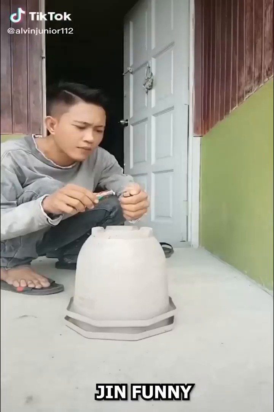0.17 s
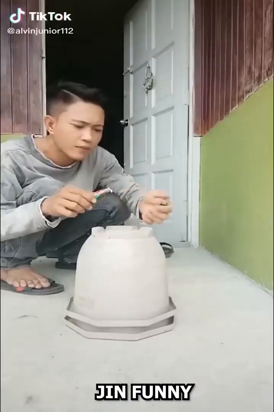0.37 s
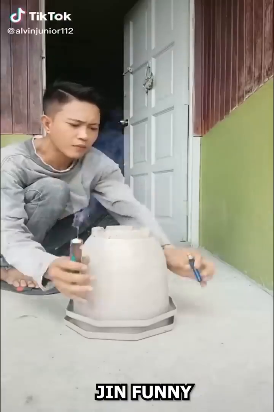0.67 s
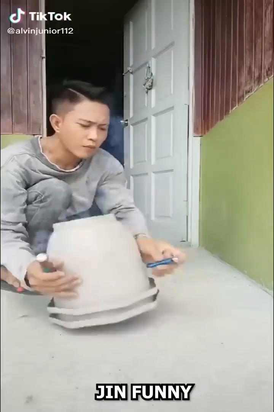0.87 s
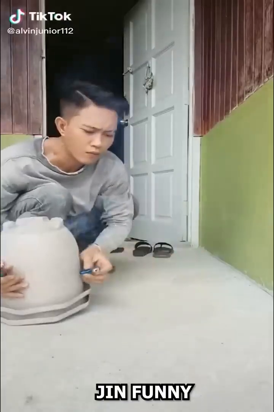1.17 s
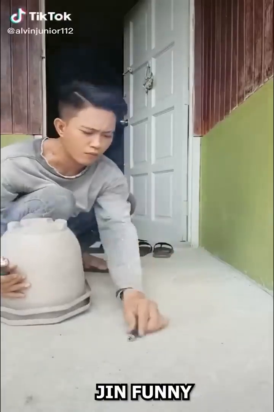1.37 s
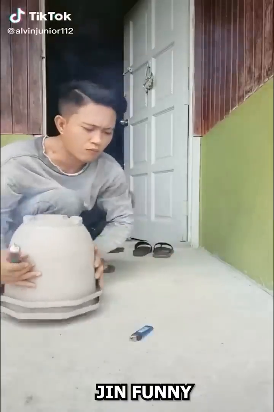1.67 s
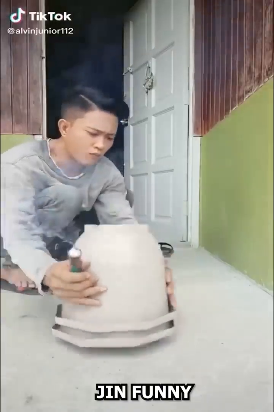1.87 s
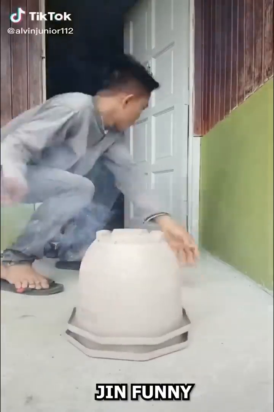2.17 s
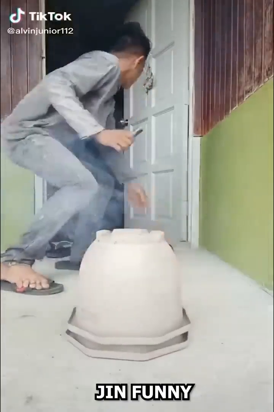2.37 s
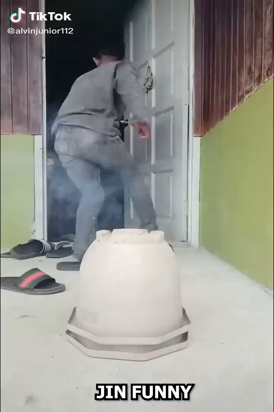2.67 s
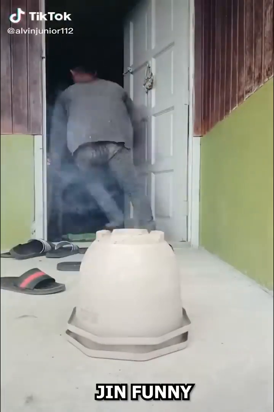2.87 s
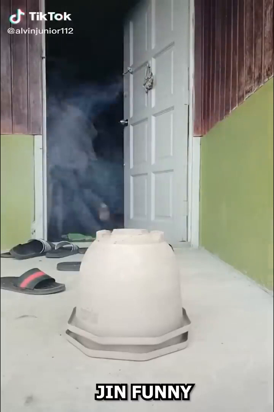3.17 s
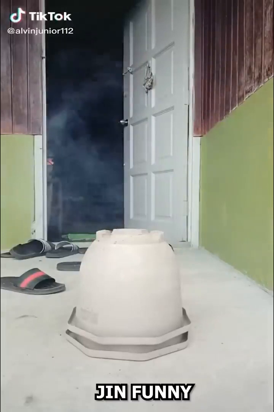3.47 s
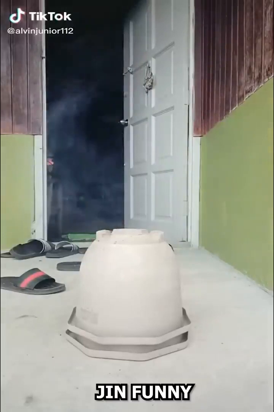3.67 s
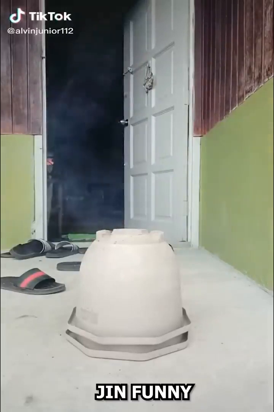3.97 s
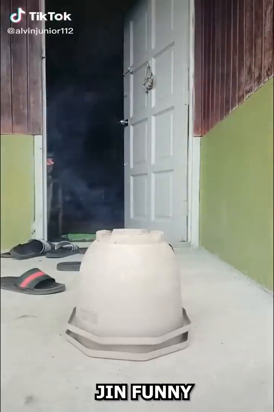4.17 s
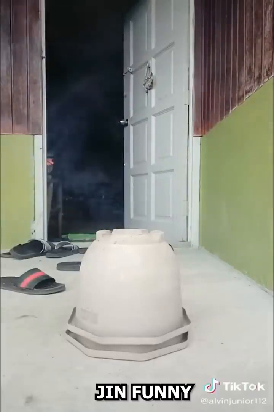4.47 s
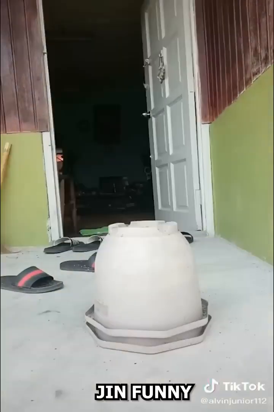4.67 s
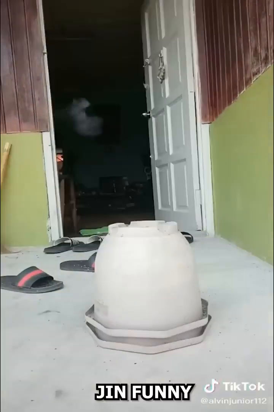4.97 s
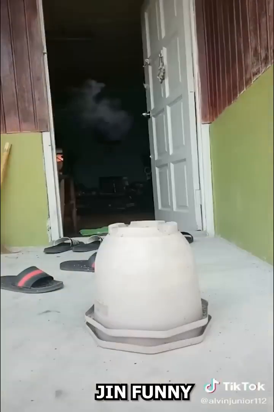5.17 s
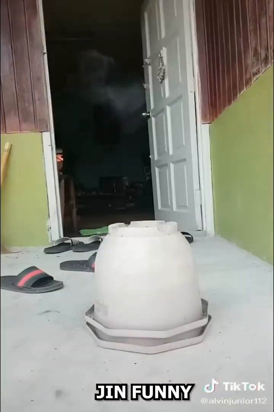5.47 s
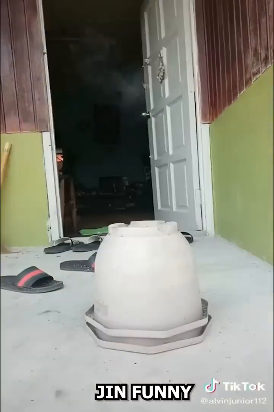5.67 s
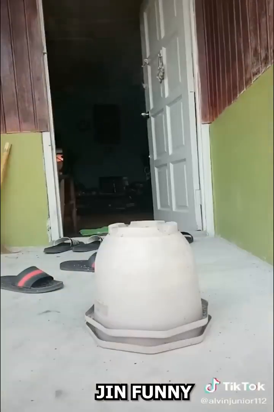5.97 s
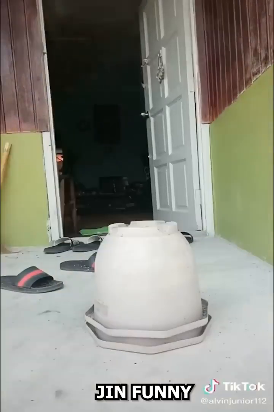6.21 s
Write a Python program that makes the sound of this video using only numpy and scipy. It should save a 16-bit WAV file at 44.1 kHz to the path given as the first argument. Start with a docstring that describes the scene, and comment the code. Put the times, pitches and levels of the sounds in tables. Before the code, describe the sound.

A lighter snaps close to the microphone over faint insects, thin animal calls and the low throb of an engine outdoors. Cloth rustles and a dog barks twice in the distance, then a wooden door takes a quick cluster of knocks and its latch clatters. After a short lull, a firecracker suddenly explodes under a plastic pot, far louder than the rest, and its dark, rolling echoes carry on to the end.

```python
"""A porch, in mono: over outdoor hiss, insects and an engine idling out of sight, animals call far off, a
lighter clicks, clothes rustle and a distant dog barks twice. Someone bumps through a wooden door, ringing its
panel and rattling its latch. Then a second scene, in stereo: an explosion goes off with a tearing crack and a
low boom, and leaves a long, loud roar of echoes that grows duller."""
import sys
import numpy as np
from scipy import signal
from scipy.io import wavfile
from scipy.ndimage import uniform_filter1d, minimum_filter1d

SR = 44100
rng = np.random.default_rng(int(sys.argv[2]) if len(sys.argv) > 2 else 0)


def put_to_file(sound):
    """Save the sound as 16-bit audio at rate SR, in the file named by the first command-line argument."""
    columns = np.atleast_2d(sound).T  # one column per channel
    safe = np.clip(columns, -1, 1)
    whole_steps = np.round(safe * 32767)
    wavfile.write(sys.argv[1], SR, whole_steps.astype(np.int16))


N = 279591
TIME = np.arange(N) / SR
BANG_S, CRACK_RISE_S = 4.688, 0.014


def amp(db):
    """Decibels to gain."""
    return 10 ** (np.asarray(db) / 20)


def unit(x):
    """Scales to rms 1."""
    return x / np.sqrt(np.mean(x ** 2) + 1e-20)


def curve(rows, t, column=1):
    """One column of a table, joined by straight lines in time."""
    rows = np.array(rows)
    return np.interp(t, rows[:, 0], rows[:, column])


def read(points, hz):
    """A table read on a log-frequency axis."""
    f, value = np.transpose(points)
    return np.interp(np.log(hz + 1), np.log(f + 1), value)


def ramp(start_s, length_s):
    """Rises from 0 to 1."""
    return np.clip((TIME - start_s) / length_s, 0, 1)


def since(s):
    """Seconds gone since s; 0 before."""
    return np.maximum(TIME - s, 0)


def swell(s, db, rise_s, fall_s):
    """A bell-shaped gain that peaks at s."""
    return amp(db) * np.exp(-((TIME - s) / np.where(TIME < s, rise_s, fall_s)) ** 2)


def add(mix, s, sound):
    """Mixes a sound in at time s."""
    part = mix[round(s * SR):][:len(sound)]
    part += sound[:len(part)]


def colour(x, spectrum):
    """Minimum-phase EQ of unit energy: the spectrum sets the tone, not the level."""
    hz = abs(np.fft.fftfreq(4096, 1 / SR))
    log_gain = np.log(amp(read(spectrum, hz)))
    taps = np.fft.ifft(np.exp(np.conj(signal.hilbert(log_gain)))).real
    return signal.oaconvolve(x, taps / np.linalg.norm(taps))[:len(x)]


def noise(spectrum):
    """Steady noise of rms 1, coloured by rows of f/Hz, level/dB."""
    return unit(colour(rng.standard_normal(N), spectrum))


def fade(x, loss_db):
    """Takes away loss_db(s, Hz) from each moment and band."""
    hz, t, bands = signal.stft(x, SR, nperseg=512)
    return signal.istft(bands * amp(-loss_db(t, hz[:, None])), SR, nperseg=512)[1][:len(x)]


def steady(x, span_s):
    """Holds the rms at 1 over spans of span_s."""
    return x / np.sqrt(abs(uniform_filter1d(x ** 2, int(span_s * SR))) + 1e-9)


def bursts(rows, spectrum):
    """Short bursts of grit, each falling 30 dB over its length, ringing with one colour."""
    envelope = np.zeros(N)
    for s, db, length in rows:
        add(envelope, s, amp(db - 30 * TIME[:SR // 4] / length))
    return colour(envelope * rng.choice([-1., 1.], N), spectrum)


def porch(x, wet_db, stretch=1):
    """Adds a tail of sparse reflections, each band dying at its own speed."""
    decay = [(200, 0.51), (900, 0.31), (4000, 0.34), (12000, 0.26)]  # reverb time before stretching: f/Hz, t60/s
    taps = rng.standard_normal(SR) * (rng.random(SR) < .1) * (TIME[:SR] > .004)
    tail = fade(taps, lambda t, hz: 60 * t / (stretch * read(decay, hz)))
    return x + amp(wet_db) * signal.oaconvolve(x, tail / np.linalg.norm(tail))[:N]


def stereo(source, width):
    """Two draws of a source as mid and side; width sets the side's level in each band."""
    side = fade(source(), lambda t, hz: -read(width, hz))
    return source() + np.array([side, -side])


def yard(air_db=-44.5, insect_db=-59, flutter_db=2.0):
    """Outdoor hiss and shrill, fluttering insects; both beds sink in a hush, the insects twice as far."""
    air_colour = [(15, -41), (25, -5), (75, -13.5), (122, -16.5), (232, -17), (419, -23.5), (912, -22),
                  (1290, -27), (2500, -23.5), (3680, -15.5), (4600, -23.5), (5970, -25.5), (7210, -37.5),
                  (13000, -36.5), (15300, -41.5)]  # outdoor hiss: f/Hz, level/dB
    insect_colour = [(2300, -27.5), (3000, -3), (3650, 9.5), (4100, 4.5), (4600, -68), (6200, -14),
                     (6800, -37)]  # the insects' band: f/Hz, level/dB
    insect_swells = [(1.2, -55, 0.29), (1.65, -52, 0.8), (3.72, -51, 0.18), (4.01, -49.5, 0.076),
                     (4.25, -47, 0.029)]  # surges above their bed: t/s, level/dB, half width/s
    hush_s, fall_s, hush_db, recover_db_per_s = 2.676, 0.32, -6.5, 2.5
    flutter = amp(flutter_db * noise([(3, -3.5), (12, 0.5), (50, -68.5)]))
    hush = amp(hush_db * ramp(hush_s, fall_s) + recover_db_per_s * since(hush_s + fall_s))
    dip = 1 - swell(3.32, -11.5, 0.13, 0.13)  # the air dips briefly after the door
    air = noise(air_colour) * amp(air_db) * hush * dip
    surges = sum(swell(s, db, width, width) for s, db, width in insect_swells)
    insects = noise(insect_colour) * (amp(insect_db) * hush ** 2 + surges) * flutter
    return air + insects


def engine(firing_hz=24.3, idle_db=-60.5, rumble_db=-13):
    """Slow exhaust pulses from afar: only the low orders arrive, each wavering, in a dull rumble."""
    orders = [(2, -22.5), (3, 0), (4, -7.5), (5, -24.5), (6, -21), (7, -38), (8, -30.5)]  # exhaust harmonics: multiple of the firing rate, level/dB
    rumble_colour = [(15, -15), (30, 1), (50, 6.5), (110, -7), (250, -5), (500, -36.5)]  # noise under the throb: f/Hz, level/dB
    swells = [(1.65, -30.5, .55, 0.25), (2.55, -39, 0.45, 0.22), (3.7, -36.5, 0.24, .22)]  # three rises out of the idle: t/s, level/dB, rise/s, fall/s
    waver = [(3, 3), (12, 1.5), (50, -83)]
    throb = sum(amp(db) * np.cos(2 * np.pi * k * firing_hz * TIME) * (1 + .16 * noise(waver))
                for k, db in orders)
    level = amp(idle_db) + sum(swell(*row) for row in swells)
    return (unit(throb) + amp(rumble_db) * noise(rumble_colour)) * level


def far_calls(octave_db=-10):
    """Thin animal calls with one overtone, most of them sagging in pitch."""
    calls = [(0, 0.19, 762, 765, -56.5), (0.675, .13, 636, 617, -59), (.8, 0.088, 598, 573, -55.5),
             (0.905, 0.093, 584, 558, -56.5)]  # faint glides: t/s, length/s, first f/Hz, last f/Hz, level/dB
    out = np.zeros(N)
    for s, length, first_hz, last_hz, db in calls:
        size = int(length * SR)
        phase = 2 * np.pi * np.cumsum(np.linspace(first_hz, last_hz, size)) / SR
        call = np.sin(phase) + amp(octave_db) * np.sin(2 * phase)
        add(out, s, amp(db) * unit(call * signal.windows.tukey(size, .5)))
    return porch(out, wet_db=-14)


def lighter():
    """The wheel scrapes, the striker snaps, and the porch answers briefly."""
    strokes = [(.349, -32, 0.055), (.359, -31, 0.04), (.3655, -19, 0.015), (.3685, -8.5, 0.0069),
               (.383, -24, .008), (.4125, -24, 0.0072)]  # scrape and snap: t/s, level/dB, length/s
    ring = [(120, -13), (380, -5.5), (650, -19), (1000, -17.5), (2400, -15.5), (3300, 3), (3900, 7.5),
            (4800, -7), (6100, -6.5), (7200, -20), (11000, -25.5), (14000, -23), (16000, -32)]  # the lighter's bright ring: f/Hz, level/dB
    return porch(bursts(strokes, ring), wet_db=-6.5, stretch=.8)


def clothes():
    """Cloth rustles in soft, dry bursts."""
    rustles = [(.8, -49, 0.33), (1.12, -43, 0.3), (1.19, -44.5, 0.2)]  # brushes of fabric: t/s, level/dB, length/s
    cloth_colour = [(1000, -31), (2400, -9), (3100, 5), (3700, -5), (5000, -7), (7000, -24)]  # their thin hiss: f/Hz, level/dB
    return bursts(rustles, cloth_colour)


def dog(rough=0.62):
    """Hoarse barks, part voice and part breath, arch in pitch and ring on between the houses."""
    barks = [(1.304, -39.5), (1.748, -38.5)]  # two barks: t/s, level/dB
    contour = [(0, 301.6, -8.5), (.025, 368, 5), (.055, 473, 4.5), (.1, 425, 4), (.14, 395, -8)]  # pitch and effort within a bark: t/s, f/Hz, level/dB
    throat = [(250, -6), (500, -9.5), (720, 0.5), (870, 0.5), (1050, -2), (1300, -8.5), (1800, -13),
              (3000, -33.5)]  # throat resonances: f/Hz, level/dB
    t, out = TIME[:int(contour[-1][0] * SR)], np.zeros(N)
    for s, db in barks:
        cycles = np.cumsum(curve(contour, t)) / SR
        folds = unit(sum(np.cos(2 * np.pi * k * cycles) for k in range(1, 8)))
        puffs = np.exp(-(cycles % 1)) * rng.standard_normal(len(t))
        bark = (1 - rough) * unit(colour(folds, throat)) + rough * unit(colour(puffs, throat))
        add(out, s, bark * amp(db + curve(contour, t, column=2)))
    return porch(out, wet_db=-5.0, stretch=2.2)


def door(low_cut_hz=158, swing_s=0.0019, rattle_s=0.069, clack_s=0.0084):
    """Each bump rings the panel, brighter near its edge; the latch rattles and clacks."""
    # knocks on the wood: t/s, level/dB, contact/ms, hand damping/(dB/s), upper modes/dB, rattle/dB
    bumps = [(2.871, -6.5, .39, 115, -0.5, -36), (2.9058, -9.5, 1.1, 450, 10, -40),
             (2.935, -3, 1.3, 450, -10, -26.5), (3, -20.5, 2.1, 9, -23, -30.5),
             (3.051, -12, 2.4, 297, -27, -25.5), (3.0591, -2.5, 1.3, 54, -9.5, -42),
             (3.122, -26, 2.8, 108, -7, -32)]
    panel_modes = [(203, 6, 0.18), (349, 4.5, 0.1), (411, -2, 0.085), (650, -14, 0.026), (980, -32, 0.024),
                   (1443, -30.5, .03)]  # wood resonances, lowest first: f/Hz, level/dB, t60/s
    clacks = [(2.8633, -18.5), (2.872, -8), (2.9905, -29.5), (3.0187, -25), (3.047, -22), (3.1078, -28),
              (3.1207, -24.5)]  # sharp latch hits: t/s, level/dB
    latch_colour = [(600, -4), (1500, -17), (2000, -6), (2900, -9), (4000, -13), (5900, -26), (7000, -38),
                    (15000, -44)]  # the latch's ring: f/Hz, level/dB
    thud = [(3.117, -20.5, 0.088)]  # the door settles: t/s, level/dB, length/s
    thud_colour = [(25, -12), (70, -0.5), (130, -10), (300, -40), (1000, -65)]  # its low weight: f/Hz, level/dB
    t, panel = TIME[:SR // 2], np.zeros(N)
    modes = [amp(db - 60 * t / t60) * np.sin(2 * np.pi * hz * t) for hz, db, t60 in panel_modes]
    lowest = modes[0] * (1 - np.exp(-t / swing_s))  # the whole panel takes a moment to swing
    for s, db, contact_ms, damping, upper_db, _ in bumps:
        push = np.sin(np.pi * np.minimum(t * 1000 / contact_ms, 1))
        ring = (lowest + amp(upper_db) * sum(modes[1:])) * amp(-damping * t)
        add(panel, s, amp(db) * signal.fftconvolve(push / push.sum(), ring))
    # little of the panel's deep bass comes through
    panel = signal.sosfilt(signal.butter(4, low_cut_hz, "high", fs=SR, output="sos"), panel)
    wood = porch(panel, wet_db=-16.0)
    latch_hits = [(s, db, rattle_s) for s, *_, db in bumps] + [(s, db, clack_s) for s, db in clacks]
    latch = porch(bursts(latch_hits, latch_colour), wet_db=-9.0)
    return wood + latch + bursts(thud, thud_colour)


def blast(air_db=-46):
    """Faint outdoor air and a soft thump, then the explosion's crack and boom."""
    air_colour = [(25, 3), (130, 6.5), (270, 9.5), (520, 5.5), (1200, -3), (2500, -7), (6000, -11.5),
                  (13000, -37.5), (13600, -57)]  # the second scene's ambience: f/Hz, level/dB
    thump = [(4.598, -32, .05)]  # just ahead of the bang: t/s, level/dB, length/s
    thump_colour = [(30, -6.5), (150, 0), (300, -24), (1000, -38), (4000, -55)]  # its muffled tone: f/Hz, level/dB
    return amp(air_db) * noise(air_colour) + bursts(thump, thump_colour) + crack() + boom()


def attack(rise_db_per_s=1400):
    """The blast grows steeply up to its peak."""
    return amp(rise_db_per_s * np.clip(TIME - BANG_S - CRACK_RISE_S, -.1, 0))


def crack_level(snap_db=-11, snap_s=0.0071, tear_db=-18, hold_s=0.32, release_s=.3):
    """A sharp snap on top of a plateau that holds, surges once and then dies ever more slowly."""
    snap = amp(snap_db) * np.exp(-since(BANG_S + CRACK_RISE_S) / snap_s)
    tear = amp(tear_db) / (1 + since(BANG_S + hold_s) / release_s) ** 3.1
    surge = swell(4.94, -21.5, 0.042, 0.042)
    return attack() * (snap + tear + surge)


def crack(grit_db=0.5, ring_s=0.029, ring_db=-3):
    """A tearing cluster of tiny shocks, ringing with close reflections; its treble dies first."""
    crack_colour = [(25, -25.5), (100, -4.5), (400, 0.5), (900, 3), (2000, -1), (4500, -4.5), (8000, -8.5),
                    (12800, -9.5), (13500, -48)]  # the shocks' broad spectrum: f/Hz, level/dB
    decay = [(500, 33), (3000, 11.5), (7000, 1.77), (12000, 1.05)]  # damping on top of the envelope: f/Hz, t60/s
    shocks = rng.standard_normal(N) * amp(grit_db * np.minimum(rng.exponential(1, N), 5))
    shocks *= rng.random(N) < .2  # thinned to a crackle
    reflections = rng.standard_normal(SR // 20) * np.exp(-TIME[:SR // 20] / ring_s)
    ring = signal.oaconvolve(shocks, reflections / np.linalg.norm(reflections))[:N]
    tear = unit(colour(shocks + amp(ring_db) * ring, crack_colour)) * crack_level()
    return fade(tear, lambda t, hz: 60 * np.maximum(t - BANG_S, 0) / read(decay, hz))


def boom(start_hz=249.2, sink_oct_per_s=5.4, width_hz=190):
    """The blast's broad low resonance sinks as it spends itself."""
    peak_db, rise_s, hold_s, fall_db_per_s = -12.5, 0.013, 0.12, 97
    pole = np.exp(-np.pi * width_hz / SR)
    swirl = rng.standard_normal(N) + 1j * rng.standard_normal(N)
    swirl = signal.lfilter([1 - pole], [1, -2 * pole, pole * pole], swirl)
    hz = start_hz * 2 ** (-sink_oct_per_s * since(BANG_S))
    tone = (swirl * np.exp(2j * np.pi * np.cumsum(hz) / SR)).real  # a noise band rides the glide
    level = ramp(BANG_S, rise_s) * amp(peak_db - fall_db_per_s * since(BANG_S + hold_s))
    return steady(tone, span_s=0.024) * level


def roar_level(near_db=-21.5, far_db=-10.5, delay_s=0.22, rise_s=0.14, fade_db_per_s=0.9, roll_db=0.57):
    """Near echoes start with the bang; the far ones build up later, roll in swells and fade slowly."""
    echoes = [(5.09, -19, 0.014), (5.18, -11, .03), (5.4, -15, .04), (5.534, -11, .025),
              (5.749, -11.5, 0.044), (5.86, -11.5, 0.038)]  # broad echoes out of the roar: t/s, level/dB, half width/s
    arrival_s = BANG_S + delay_s
    far = ramp(arrival_s, rise_s) * amp(far_db - fade_db_per_s * since(arrival_s))
    roll = amp(roll_db * noise([(3, -1.5), (10, 4), (35, -73.5)]))
    swells = [swell(s, db, width, width) for s, db, width in echoes]
    return np.linalg.norm([amp(near_db) * attack(), far * roll, *swells], axis=0)  # summed as power


def roar(air_db_per_khz_s=2.5, mid_s=5.205, patchy_db=1.5):
    """Countless echoes of the shock arrive in swells; later ones have crossed more air and are duller."""
    roar_colour = [(13, -32), (25, -21), (45, -10), (80, -0.5), (155, -2), (200, -3.5), (370, 0.5),
                   (650, -1.5), (1240, -7), (2230, -17), (4470, -29.5), (8950, -49), (13000, -72)]  # the echoes' dark tone: f/Hz, level/dB
    slaps = [(4.896, -2.5, 0.03), (4.997, -4, 0.04)]  # single hard echoes: t/s, level/dB, length/s

    def loss_db(t, hz):
        """Random patches of light and shade, plus the air's growing treble loss."""
        patches = rng.standard_normal((len(hz), len(t)))
        patches = unit(uniform_filter1d(uniform_filter1d(patches, size=3, axis=0), size=9, axis=1))
        return patchy_db * patches + air_db_per_khz_s * hz / 1000 * np.clip(t - mid_s, -.5, 2)
    rolling = steady(unit(fade(noise(roar_colour), loss_db)), span_s=0.055)
    return rolling * roar_level() + bursts(slaps, roar_colour)


def scene(dip_s=4.415, dip_db=-13, change_s=4.436):
    """The mono porch, a brief dip, then the explosion in stereo: narrow bass, wide treble."""
    blast_width = [(60, -16.5), (200, -38), (400, -37), (700, -32.5), (1400, -16.5), (4500, -7),
                   (8000, -3.5)]  # spread of the blast: f/Hz, side over mid/dB
    roar_width = [(60, -56), (600, -86.5), (1300, -37), (2400, -15.5), (4500, -5.5), (8000, -1.5)]  # spread of the echoes: f/Hz, side over mid/dB
    on_porch = yard() + engine() + far_calls() + lighter() + clothes() + dog() + door()
    explosion = stereo(blast, blast_width) + stereo(roar, roar_width)
    return np.where(TIME < change_s, on_porch * amp(dip_db * (TIME > dip_s)), explosion)


def record(dry, edge_hz=15450):
    """A fast limiter turns the peaks down to full scale; a steep low-pass trims the top."""
    gain = 1 / np.maximum(abs(dry).max(axis=0), 1)
    gain = uniform_filter1d(minimum_filter1d(gain, size=161), size=161)
    low_pass = signal.firwin(511, edge_hz, window=("kaiser", 9), fs=SR)
    return signal.oaconvolve(dry * gain, low_pass[None], "same")


dry = scene()
out = record(dry)
put_to_file(out)
```